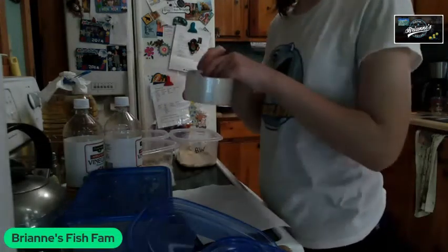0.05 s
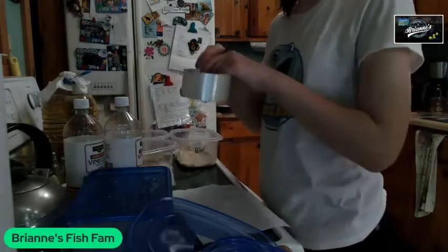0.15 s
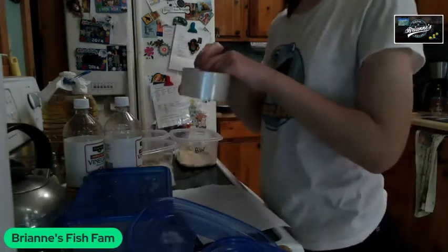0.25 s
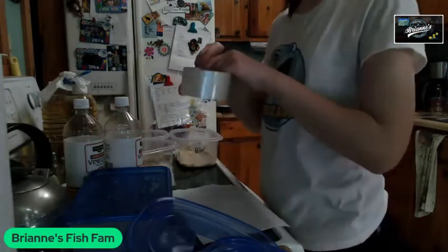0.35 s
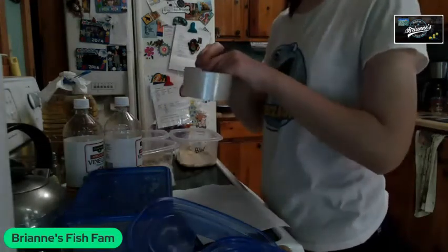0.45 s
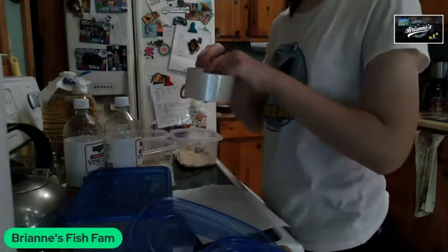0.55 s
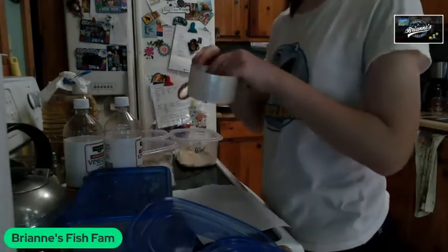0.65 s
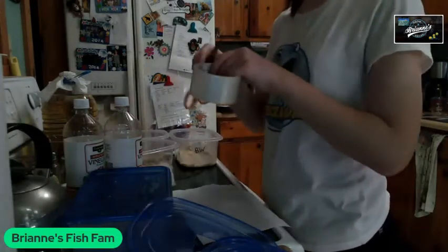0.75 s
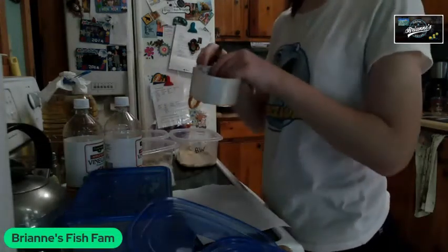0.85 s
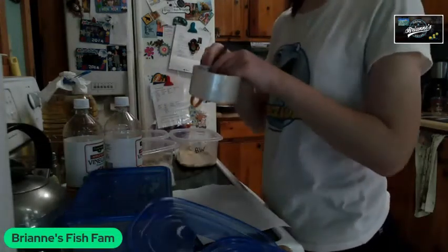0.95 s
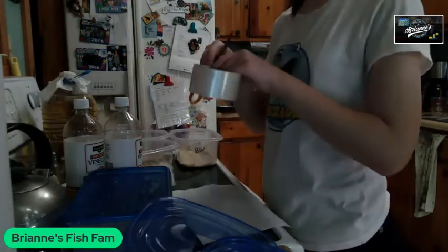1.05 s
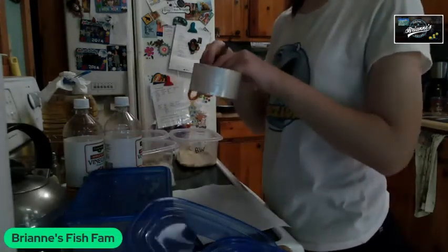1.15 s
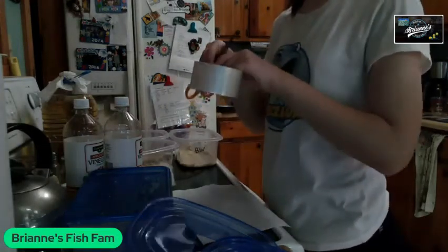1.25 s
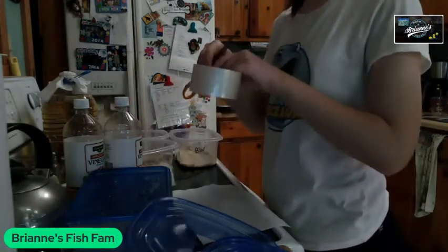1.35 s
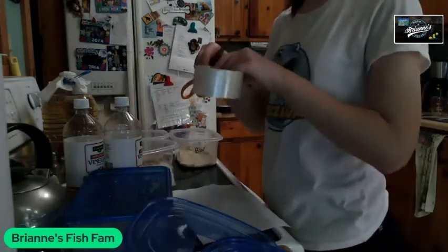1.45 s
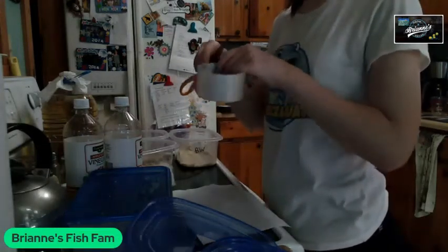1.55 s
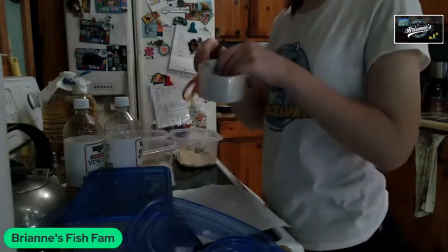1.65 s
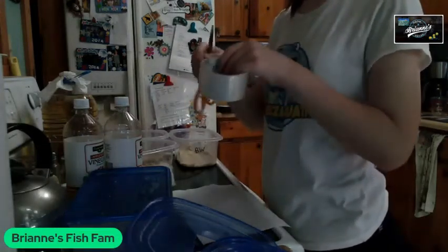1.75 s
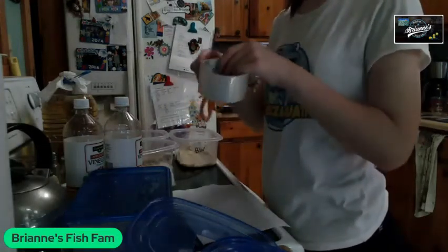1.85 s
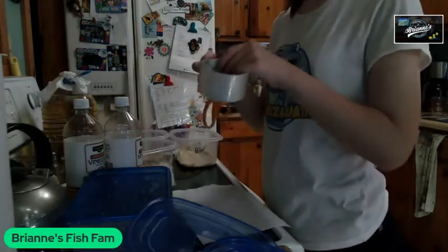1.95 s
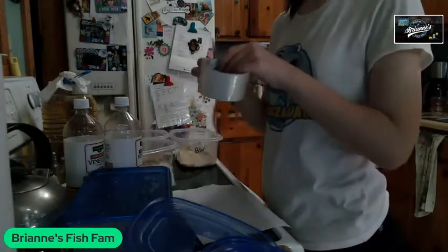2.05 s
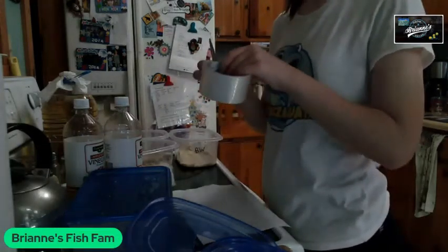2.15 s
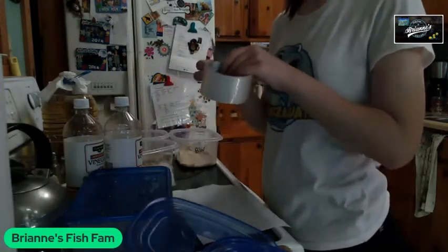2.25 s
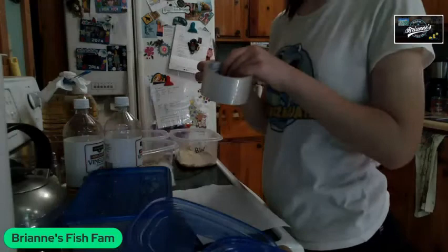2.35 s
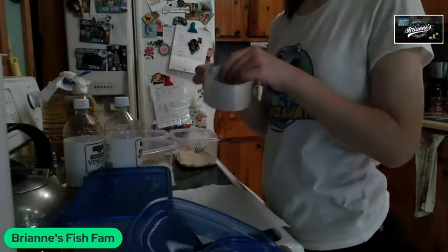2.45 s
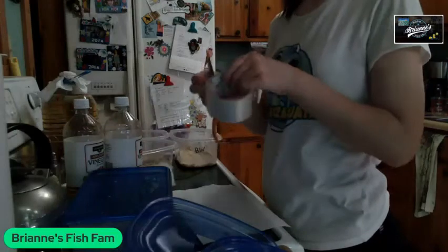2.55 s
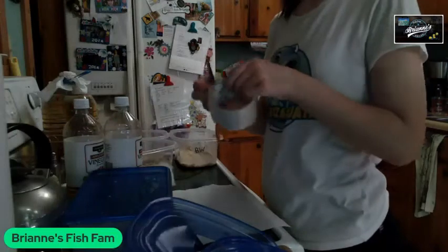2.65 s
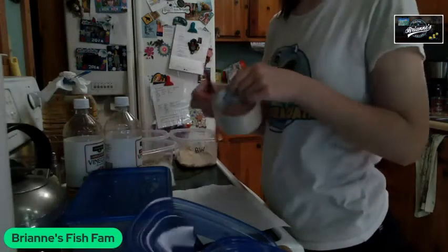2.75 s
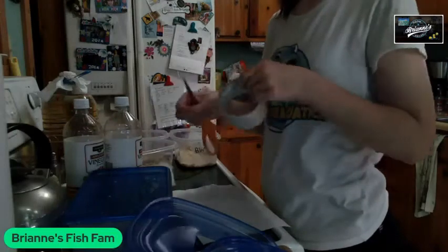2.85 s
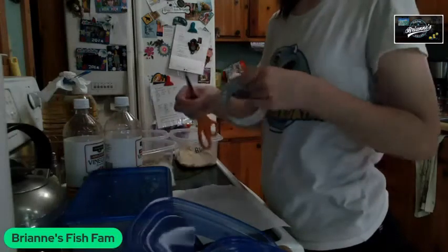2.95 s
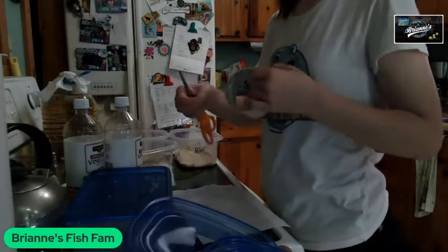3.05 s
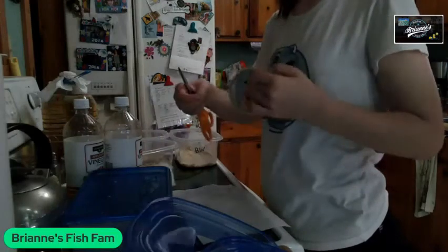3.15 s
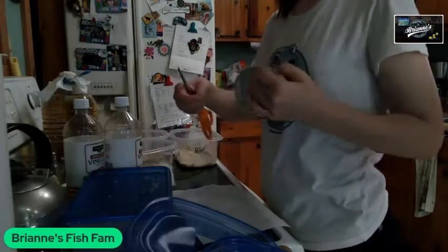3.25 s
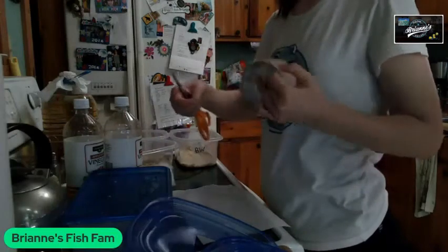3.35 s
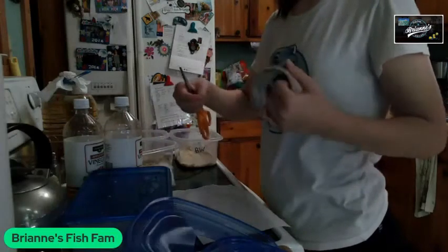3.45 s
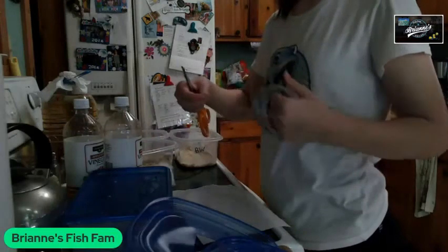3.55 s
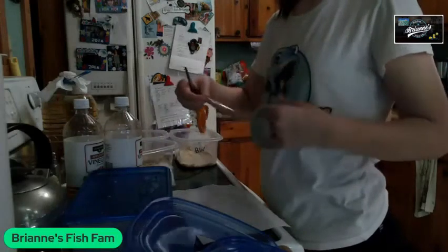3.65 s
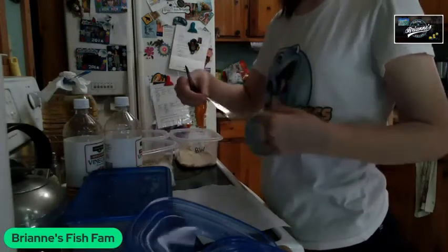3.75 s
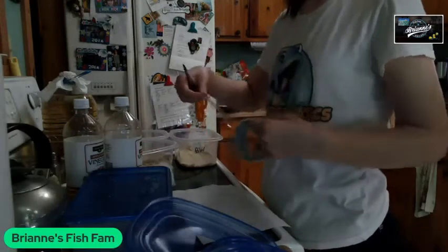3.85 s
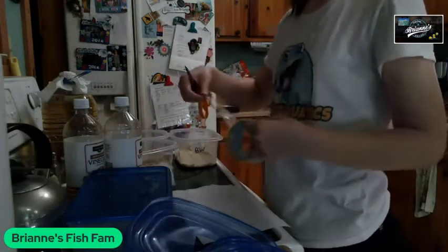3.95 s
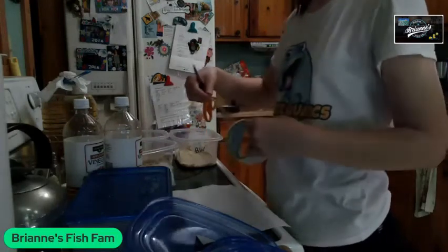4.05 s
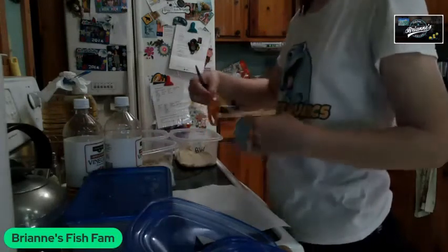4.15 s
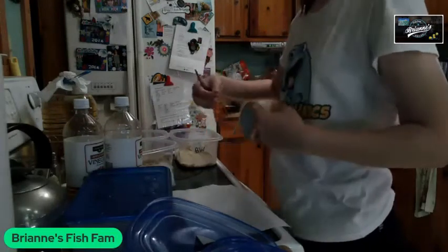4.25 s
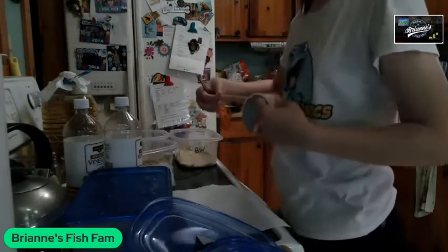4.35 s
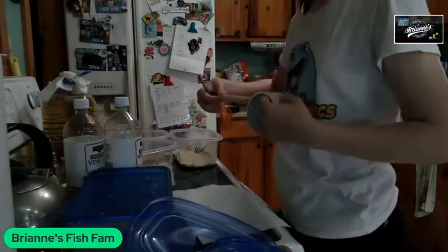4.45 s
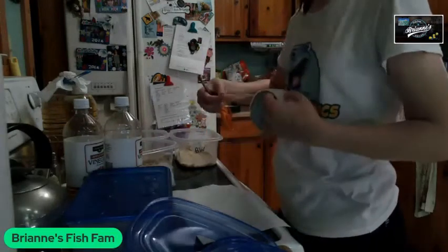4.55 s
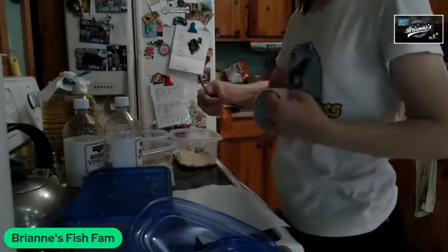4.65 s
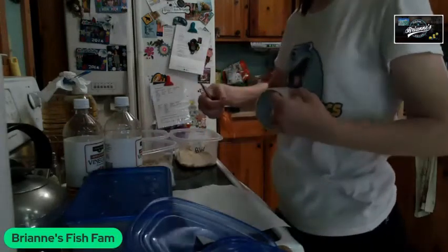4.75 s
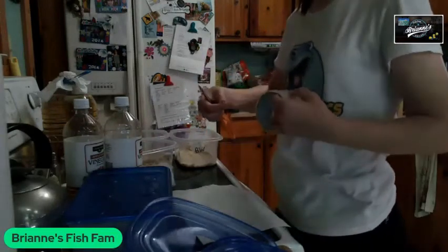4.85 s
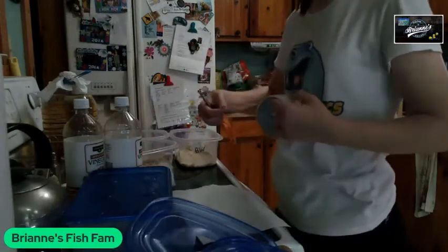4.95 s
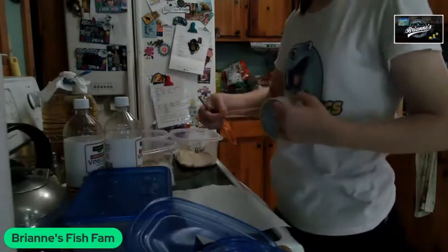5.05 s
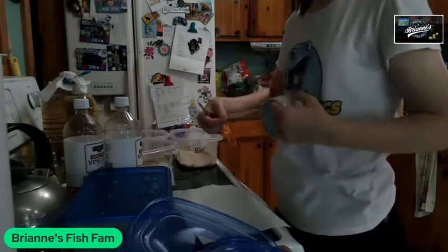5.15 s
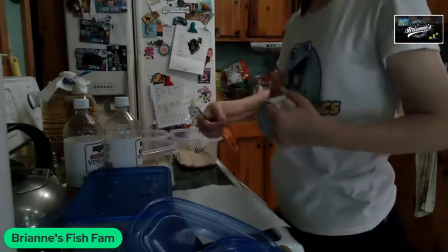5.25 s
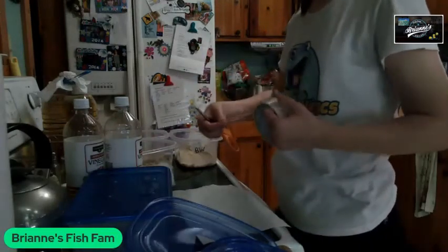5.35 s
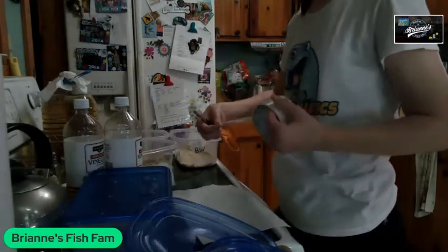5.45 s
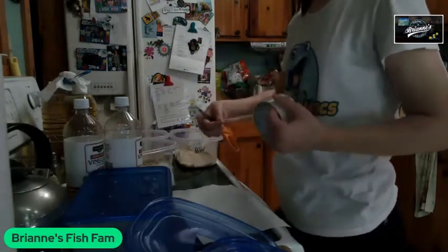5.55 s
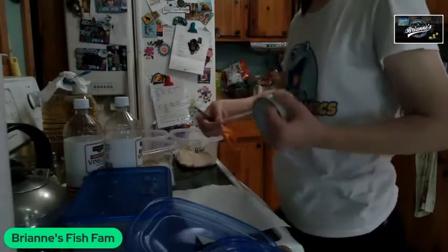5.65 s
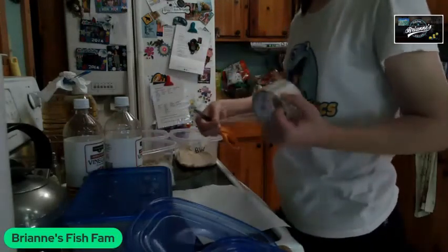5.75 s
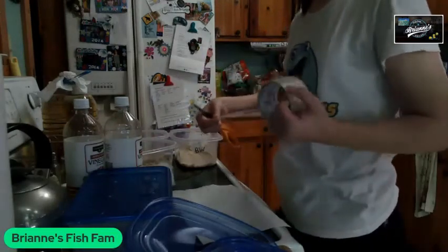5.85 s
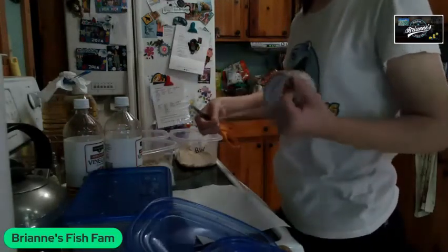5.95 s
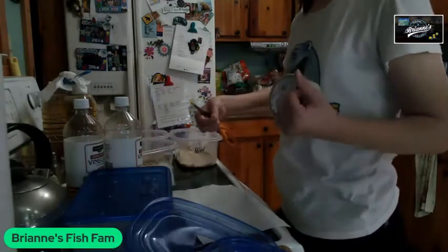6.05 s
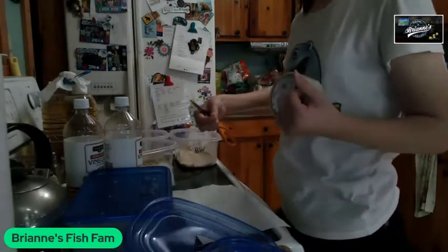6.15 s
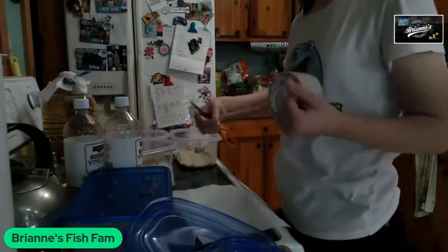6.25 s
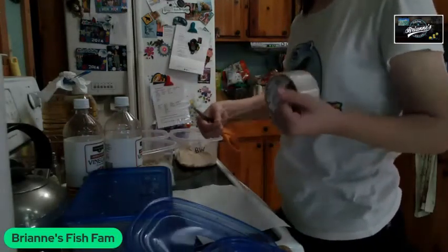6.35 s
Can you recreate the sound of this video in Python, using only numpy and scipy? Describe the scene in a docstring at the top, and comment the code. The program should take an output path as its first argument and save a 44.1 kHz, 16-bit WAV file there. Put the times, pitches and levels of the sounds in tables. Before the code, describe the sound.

In a quiet small kitchen, fingernails tick faintly at the end of a roll of clear packing tape. The tape then comes loose in a quick run of short, harsh rips, with soft finger bumps on the hollow core. After a pause with a few small ticks, three more loud pulls follow near the end. A refrigerator hums faintly throughout under a soft rush of air, and the tape sounds close.

```python
"""In a small kitchen, clear packing tape is picked loose and yanked off its roll in short, harsh pulls.
The glue creaks, then lets go in rapid stick-slip; the freed strip radiates the slips as a quarter-wave
resonator, lower as it gets longer. Fingers bump the hollow core, and a refrigerator hums over the room's
rush of air. The camera's gain control ducks at the first hard pull and stays down."""
import sys
import numpy as np
from scipy import signal
from scipy.fft import rfft, irfft, next_fast_len
from scipy.io import wavfile
from scipy.ndimage import uniform_filter1d, minimum_filter1d, map_coordinates

SR = 44100
rng = np.random.default_rng(int(sys.argv[2]) if len(sys.argv) > 2 else 0)


def waveform_to_disk(signal):
    """Save audio, clipped to [-1, 1], as 16-bit WAV at the path in sys.argv[1]."""
    frames = np.transpose(np.atleast_2d(signal))
    scaled = np.clip(frames, -1, 1) * 32767
    samples = np.round(scaled).astype(np.int16)
    wavfile.write(sys.argv[1], SR, samples)


N = 282240

# Pulls on the tape; bite accents the first slips, sharp shelves the treble, boom is the strip's resonance:
# start_s, length_s, level_db, start_strip_m, bite_db, sharp_db, boom_db
TAPE_PULLS = [(2.461, 0.0117, -23.5, .018, -0.5, -2, 10), (2.487, 0.017, -12, .027, 1.5, 5.5, -3.5),
              (2.730, 0.0081, -1, 0.0381, -2.5, 5.5, 1.5), (2.755, 0.11, -1.5, 0.071, -5, 3.5, 11.5),
              (2.974, 0.025, -9, .042, 6, -5, 9.5), (3.252, .115, 1, .2, -11, 2.5, -6.5),
              (5.391, .085, -2, .11, -3.5, -1, -2), (5.664, 0.1, -1, 0.15, -0.5, -0.5, -0.5),
              (5.919, 0.059, -1.5, .145, -11, -1.5, 9.5)]


def amp(db):
    """Amplitude ratio of a level in decibels."""
    return 10 ** (np.asarray(db) / 20)


def unit(x):
    """Normalisation to rms 1."""
    return x / np.sqrt(np.mean(x ** 2) + 1e-20)


def along(points, hz):
    """Interpolation of (frequency_hz, value) points on a logarithmic frequency axis."""
    knots_hz, values = np.transpose(points)
    return np.interp(np.log(hz + 1), np.log(knots_hz), values)


def wobble(rate_hz):
    """Slow random modulation: a spline through rate_hz knots a second."""
    knots = rng.standard_normal(int(N * rate_hz / SR) + 4)
    return map_coordinates(knots, [np.arange(N) * rate_hz / SR])


def filtered(x, response):
    """Zero-phase filtering by a gain over frequency."""
    size = next_fast_len(N + SR // 2)
    return irfft(rfft(x, size) * response(np.fft.rfftfreq(size, 1 / SR)), size)[:N]


def minimum_phase(response, size=4096):
    """The causal impulse response, of energy 1, that has this gain over frequency."""
    gain = np.maximum(response(np.fft.rfftfreq(size, 1 / SR)), 1e-6)
    cepstrum = irfft(np.log(gain))
    cepstrum[1:size // 2] *= 2
    cepstrum[size // 2 + 1:] = 0
    impulse = irfft(np.exp(rfft(cepstrum)))
    return impulse / np.linalg.norm(impulse)


def add(track, start_s, x):
    """Superposition of x on the track from start_s."""
    part = track[round(start_s * SR):][:len(x)]
    part += x[:len(part)]


def through_port(spectrum, hz):
    """Port resonance: the gain of a source's spectrum through a microphone that rings near 5 kHz."""
    # Response of the port: frequency_hz, gain_db
    port = [(3200, 2.5), (3900, 6.5), (4650, 13.5), (5000, 15.5), (5400, 12.5), (6400, 3.5), (7700, -5),
            (9500, -2.5), (12000, -8), (15500, -10.5)]
    return amp(along(spectrum, hz) + along(port, hz))


def film(edge_hz, sharp_db, boom_db, sharp_hz=9000, boom_width=.2, leak_db=-20):
    """Impulse response of the strip: it resonates at edge_hz; below that only the roll radiates."""
    # Spectrum of taut film: frequency_hz, density_db
    taut_film = [(100, -17), (250, -12.5), (450, -16), (700, -13), (1250, -16.5), (1900, -17.5),
                 (2500, -12.5), (3100, -12.5), (7000, -8.5), (15000, -17)]
    # Resonances of the cardboard core: centre_hz, width_hz, gain_db
    core_modes = [(658, 120, 5.5), (990, 60, 7.5), (1915, 240, 6.5)]

    def response(hz):
        core = sum(db / (1 + (2 * (hz - centre) / width) ** 2) for centre, width, db in core_modes)
        boom = boom_db / (1 + ((hz / edge_hz - 1) / boom_width) ** 2)
        sharp = sharp_db * hz ** 4 / (hz ** 4 + sharp_hz ** 4)
        radiated = hz ** 4 / (hz ** 4 + edge_hz ** 4)
        # every length and tension of film has its own scatter of small resonances
        ripple = 2.3 * map_coordinates(rng.standard_normal(160), [hz / 140])
        return through_port(taut_film, hz) * amp(core + boom + sharp + ripple) * (radiated + amp(leak_db))
    return minimum_phase(response)


def air(level_db=-53, waver_db=1.12):
    """Ambient noise: the room's broadband rush, wavering slightly in level."""
    # Spectrum of the room noise: frequency_hz, density_db
    room_noise = [(25, -14), (95, -3), (140, 6), (250, -2.5), (410, -6), (490, -9.5), (900, -7.5),
                  (1150, -16), (2400, -18.5), (3000, -24), (5000, -29), (9000, -25.5), (11700, -28),
                  (12500, -38.5)]
    envelope = amp(level_db + waver_db * wobble(14))
    rush = filtered(rng.standard_normal(N), lambda hz: through_port(room_noise, hz))
    return envelope * unit(rush)


def refrigerator(mains_hz=60, waver_db=2.13, drift_rad=.08):
    """Forced vibration: mains harmonics and compressor tones, each slightly unsteady."""
    # Motor hum: harmonic_number, level_db
    hum = [(1, -55.5), (2, -58.5), (3, -58.5), (5, -69.5), (6, -75)]
    # Compressor tones: pitch_hz, level_db
    whine = [(419.9, -65.5), (479.1, -69.5), (780.6, -73), (920.5, -71.5), (1082, -75), (1141, -75),
             (1200, -70.5), (1443, -70), (1502, -82), (1620, -86.5), (1922, -77)]
    out, t = np.zeros(N), np.arange(N) / SR
    for hz, db in [(harmonic * mains_hz, db) for harmonic, db in hum] + whine:
        rms = amp(db + waver_db * min(hz / 400, 1) * wobble(4.4))  # low tones waver less
        phase = 2 * np.pi * (hz * t + rng.random()) + drift_rad * wobble(2.9)
        out += np.sqrt(2) * rms * np.sin(phase)
    return out


def rubbing(level_db=-66, patchy_db=2.5):
    """Sliding friction: fingertips excite the film with noise in uneven strokes."""
    friction = rng.standard_normal(N)
    rub = signal.fftconvolve(friction, film(edge_hz=4800, sharp_db=-10, boom_db=3.5))[:N]
    return amp(level_db + patchy_db * wobble(14)) * unit(rub)


def bumps(rise_s=.009, faint_db=-51, spread_db=3, faint_count=45):
    """Soft impact: skin contacts swell and fade in the core, with fainter ones as the roll is turned."""
    # Fingers on the hollow roll: start_s, pitch_hz, level_db
    contacts = [(2.45, 433, -40.5), (2.579, 253.7, -35), (2.663, 253.3, -36), (3.11, 602, -41.5),
                (3.456, 262, -42.5), (3.48, 874, -39), (4.199, 273, -41.5), (5.56, 430, -33.5)]
    out, t = np.zeros(N), np.arange(SR // 8) / SR
    swell = (t / rise_s * np.exp(1 - t / rise_s)) ** 2
    faint = [(when * N / SR, 230 * 4 ** pitch, faint_db + spread_db * (size - 2 * pitch))
             for when, pitch, size in rng.random((faint_count, 3))]
    for start_s, hz, db in contacts + faint:
        add(out, start_s, amp(db) * swell * np.sin(2 * np.pi * hz * t))
    return out


def slips(t, rate_hz, scatter_db=1.5, tear_s=.0012):
    """Stick-slip at rms 1: each release is a snap, then a brief fizz of breaking glue threads."""
    jitter, drift, sizes = rng.standard_normal((3, 128))
    gaps = np.exp(.17 * jitter + .04 * np.cumsum(drift)) / rate_hz
    times = np.cumsum(gaps) - gaps[0]
    inside = times < t[-1]
    snaps = np.bincount((times[inside] * SR).astype(int), amp(scatter_db * sizes[inside]), len(t))
    tearing = signal.lfilter([1], [1, -np.exp(-1 / (tear_s * SR))], snaps)
    threads = tearing * rng.standard_normal(len(t))
    return unit(unit(snaps) + unit(threads))


def picks(slip_hz=450, faint_db=-66, spread_db=6, faint_s=.012, low_hz=2200, high_hz=5500, faint_count=12):
    """Stick-slip rings very short pieces of film: nail picks, stray ticks, the creak before a pull."""
    # Fingernail picks and snaps of the loose end: start_s, level_db, decay_s, ring_hz
    nail_picks = [(0.913, -59, .012, 3500), (1.324, -35.5, .003, 4140), (1.332, -39, .0035, 5190),
                  (1.738, -56, .021, 8030), (1.778, -70, .015, 1900), (2.086, -55.5, .013, 8460),
                  (2.254, -53, .023, 5450), (2.979, 1, .0012, 4376), (3.842, -48.5, 0.048, 4500),
                  (3.922, -42.5, 0.0133, 5445), (4.594, -55, 0.03, 5030)]
    creak_s, creak_db, creak_hz = .007, -24, 5200  # level relative to the pull
    faint = [(when * N / SR, faint_db + spread_db * size, faint_s, low_hz * (high_hz / low_hz) ** pitch)
             for when, size, pitch in rng.random((faint_count, 3))]
    creaks = [(start_s - creak_s, db + creak_db, creak_s, creak_hz) for start_s, _, db, *_ in TAPE_PULLS]
    out = np.zeros(N)
    for start_s, db, decay_s, ring_hz in nail_picks + faint + creaks:
        t = np.arange(int(2 * decay_s * SR)) / SR
        stub = film(ring_hz, sharp_db=-6, boom_db=10, boom_width=.031, leak_db=-14.5)
        scratch = amp(db) * np.exp(-t / decay_s) * slips(t, slip_hz)
        add(out, start_s, signal.fftconvolve(scratch, stub))
    return out


def tape(grip_db=3, grip_hz=90, stages=4):
    """Quarter-wave resonance: slips against uneven glue drive a strip that deepens as it lengthens."""
    hand_m_per_s, sound_m_per_s = 1.5, 343
    speed_up_s, bite_s, stop_s = .014, .0054, .0024  # time constants
    sag_db_per_s, doubling_db = 49.5, 2  # the hand's force eases; a longer strip is louder
    slip_hz, reference_m, slowing = 270, .17, .2  # a longer, springier strip slips more slowly
    out, grip = np.zeros(N), amp(grip_db * wobble(grip_hz))
    for start_s, length_s, db, start_m, bite_db, sharp_db, boom_db in TAPE_PULLS:
        t = np.arange(int((length_s + 3 * stop_s) * SR)) / SR
        speed = hand_m_per_s * (1 - np.exp(-t / speed_up_s)) * (t < length_s)
        strip_m = start_m + np.cumsum(speed) / SR
        doublings = np.log2(strip_m / start_m)
        force = amp(db + bite_db * np.exp(-t / bite_s) + doubling_db * doublings - sag_db_per_s * t)
        release = np.exp(-np.maximum(t - length_s, 0) / stop_s)
        rate_hz = slip_hz * (reference_m / strip_m.mean()) ** slowing
        peel = force * release * grip[round(start_s * SR):][:len(t)] * slips(t, rate_hz)
        position = (stages - 1) * doublings / doublings[-1]
        for stage, stage_m in enumerate(np.geomspace(start_m, strip_m[-1], stages)):
            share = np.maximum(1 - np.abs(position - stage), 0)  # cross-fade from short to long strip
            edge_hz = sound_m_per_s / (4 * stage_m)
            add(out, start_s, signal.fftconvolve(peel * share, film(edge_hz, sharp_db, boom_db)))
    return out


def kitchen(x, tail_db=2, build_s=.0062, early_db=-2, early_s=.009, echoes=8):
    """Reverberation: early reflections from counter and cupboards, then a diffuse tail that builds."""
    # Reverberation time: frequency_hz, t60_s
    decay_times = [(200, 0.17), (1000, 0.23), (5000, 0.24), (12000, 0.22)]
    out, block = np.zeros(N), SR // 20
    for start in range(0, N, block):  # new random paths for each block, as the hands move
        hz, t, noise = signal.stft(rng.standard_normal(SR // 4), SR, nperseg=256)
        decay = amp(-60 * t / along(decay_times, hz)[:, None])
        build = 1 - np.exp(-t / build_s)
        _, tail = signal.istft(noise * decay * build, SR, nperseg=256)
        room = amp(tail_db) * tail / np.linalg.norm(tail)
        delays = (rng.uniform(.1, 1, size=echoes) * early_s * SR).astype(int)
        room[delays] += amp(early_db) * rng.choice([-1, 1], size=echoes) / np.sqrt(echoes)
        room[0] += 1  # direct sound
        add(out, start / SR, signal.fftconvolve(x[start:start + block], room / np.linalg.norm(room)))
    return out


def scene():
    """Superposition: tape, picks and bumps reverberate over the hum, the air and the rubbing."""
    return (kitchen(tape() + picks() + bumps()) + refrigerator() + air() + rubbing())[None]


def record(dry, threshold_db=-10.5, range_db=7, ceiling=.92, top_hz=15700):
    """Automatic gain control drops on loud sound and holds; a peak limiter and a steep low-pass follow."""
    x = dry[0]
    level_db = 10 * np.log10(np.abs(uniform_filter1d(x ** 2, size=1200)) + 1e-12)
    excess_db = np.maximum.accumulate(level_db) - threshold_db
    ducked = x * amp(-np.clip(2 * excess_db, 0, range_db))
    safe_gain = ceiling / np.maximum(np.abs(ducked), ceiling)
    limited = ducked * uniform_filter1d(minimum_filter1d(safe_gain, size=65), size=65)
    return filtered(limited, lambda hz: 1 / (1 + (hz / top_hz) ** 160))[None]


dry = scene()
out = record(dry)
waveform_to_disk(out)
```